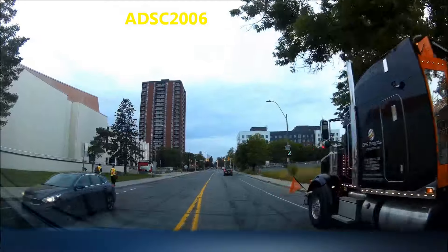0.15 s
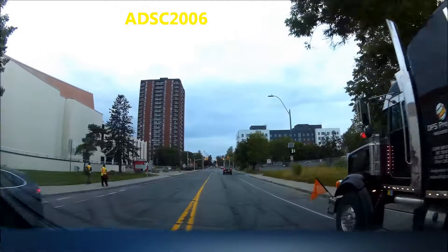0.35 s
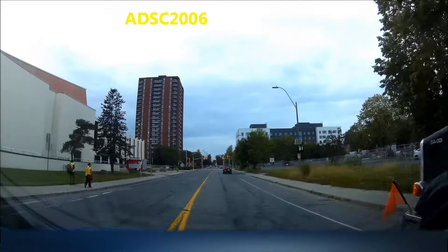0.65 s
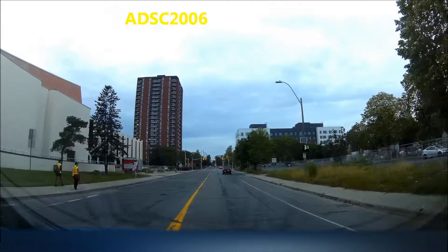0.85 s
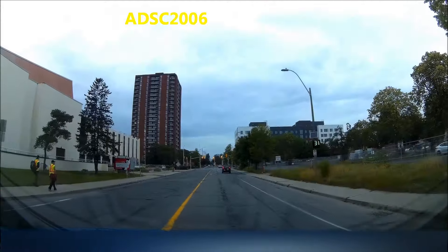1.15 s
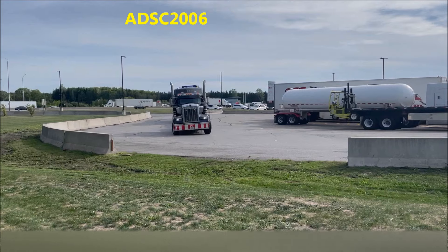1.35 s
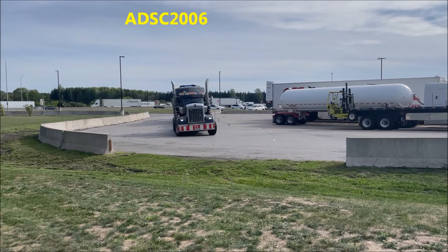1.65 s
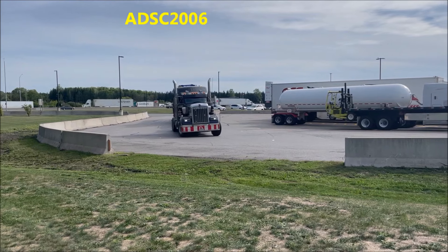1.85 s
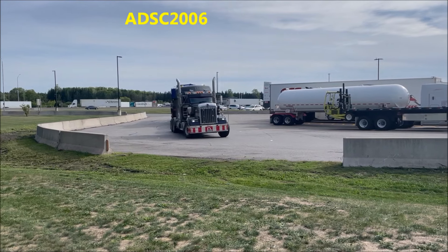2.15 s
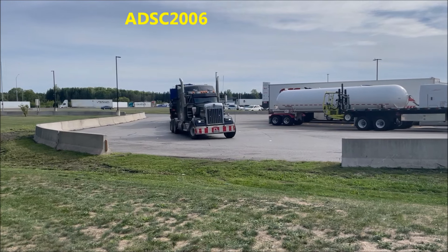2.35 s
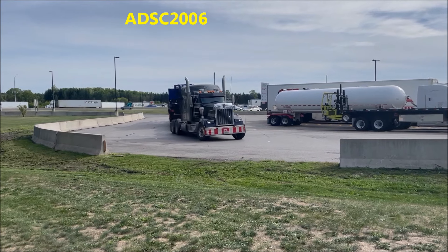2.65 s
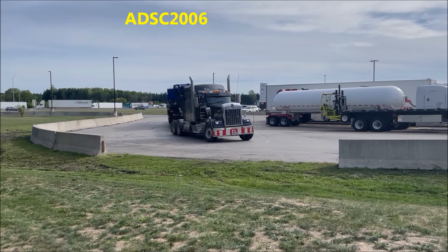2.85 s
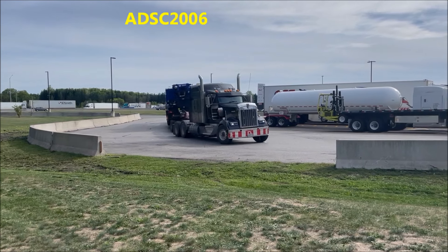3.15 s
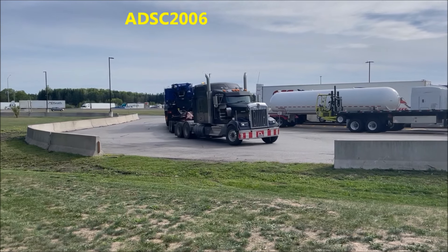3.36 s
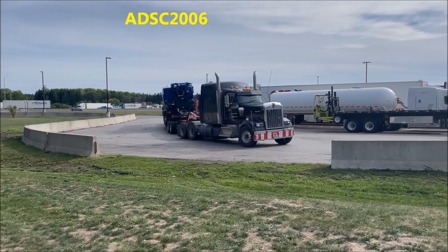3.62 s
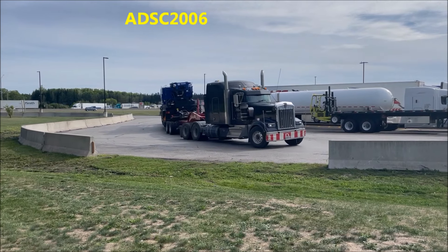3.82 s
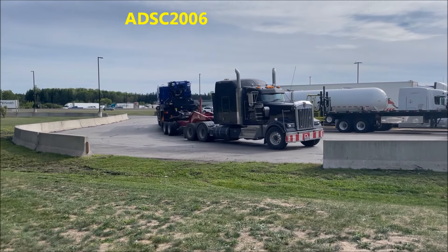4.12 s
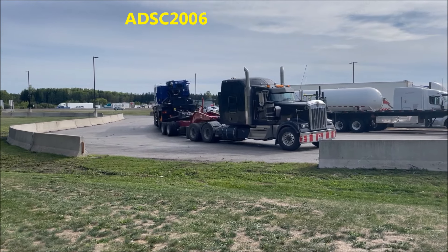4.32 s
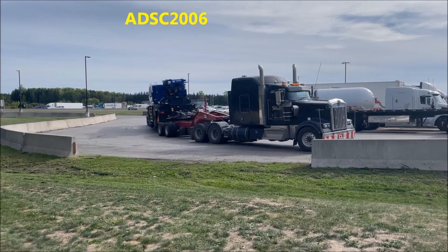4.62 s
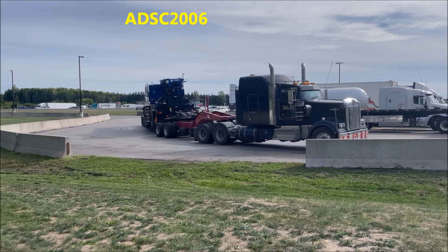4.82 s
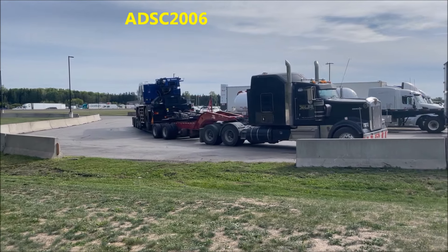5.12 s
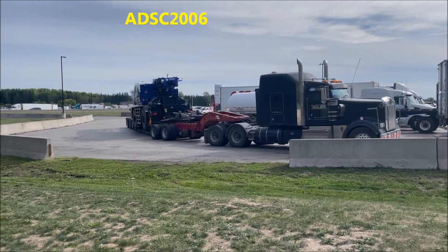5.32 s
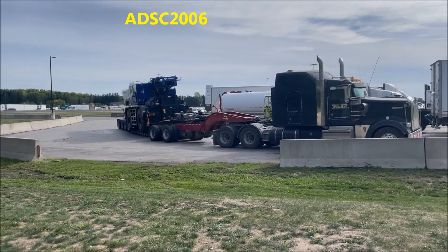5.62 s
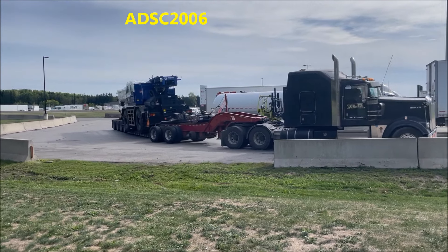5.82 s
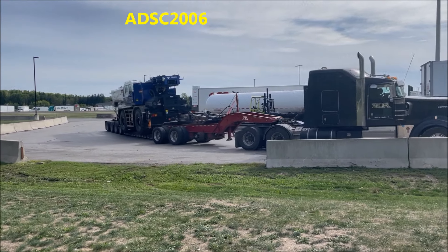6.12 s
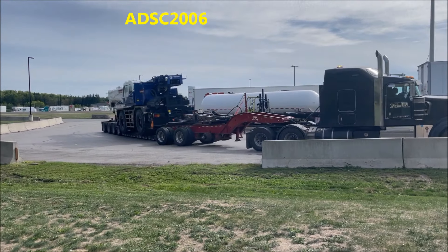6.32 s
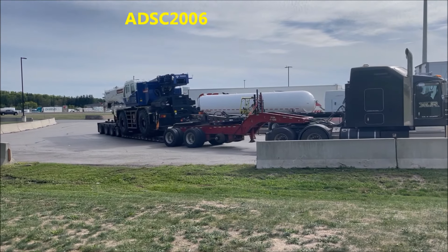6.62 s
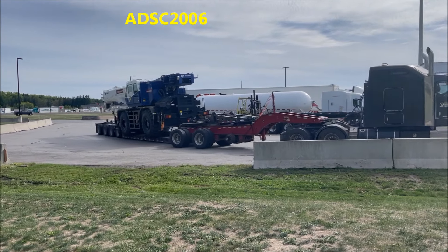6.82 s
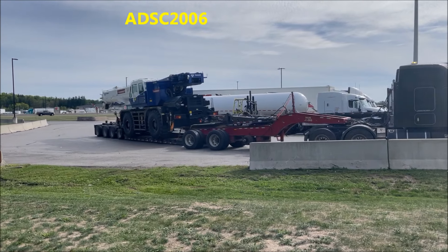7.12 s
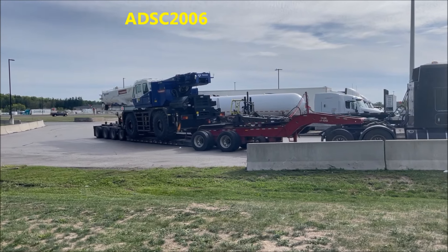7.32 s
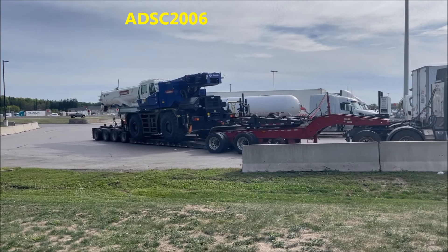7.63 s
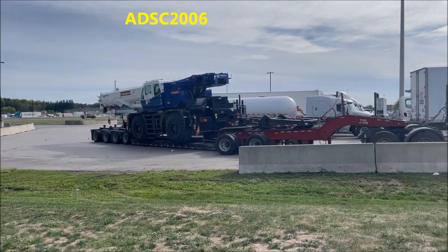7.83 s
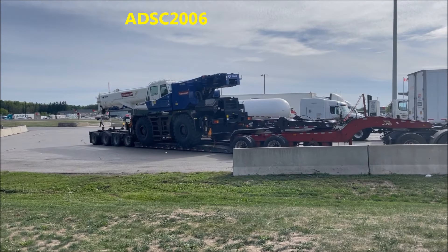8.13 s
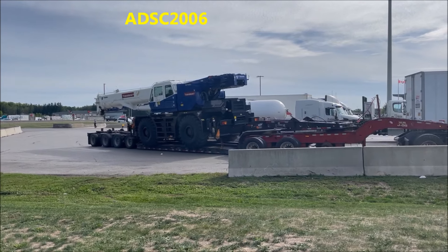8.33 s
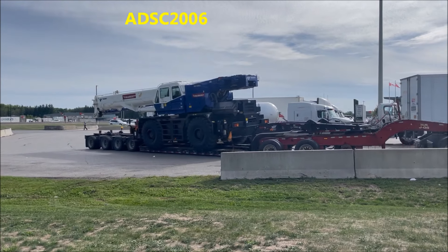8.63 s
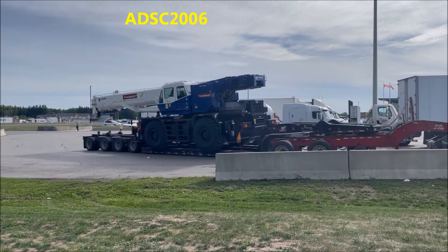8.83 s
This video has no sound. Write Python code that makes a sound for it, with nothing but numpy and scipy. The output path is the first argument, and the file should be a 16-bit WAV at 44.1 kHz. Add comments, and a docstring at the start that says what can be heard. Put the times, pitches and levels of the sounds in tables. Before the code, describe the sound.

Bassy, muffled car-interior rumble with irregular bumps comes first, the same in both ears. A hard cut leads to wide outdoor stereo: a six-cylinder diesel tractor pulling a low trailer, rumbling and clattering steadily, with brief squeal and air release. It shifts up, lugs with bright knocking, then gathers speed and draws gradually nearer. The trailer bangs dully, and near the end a faint turbo whistle sweeps upward with a rush of gas.

```python
"""Road rumble inside a moving car: bumps make the body drone and the cabin boom, and the trim rattles.
The car stops dead; after a short gap a heavy six-cylinder diesel tractor hauls a low loader across an open lot.
Metal squeals thinly, air is let off, the trailer thumps; the engine runs high, then shifts up, lugs and knocks.
Turning its side and then its rear to the listener, it draws nearer and climbs in speed again, while the
turbocharger spools up and whistles. Layers are shaped noise, sines and ringing modes under moving levels."""
import sys
import numpy as np
from scipy import signal
from scipy.fft import rfft, irfft, next_fast_len
from scipy.io import wavfile

SR = 44100
rng = np.random.default_rng(int(sys.argv[2]) if len(sys.argv) > 2 else 0)


def output_pcm(signal):
    """Save a mono or channel-first signal as 16-bit PCM at the path in sys.argv[1].

    Samples are clipped to [-1, 1] before scaling.
    """
    pcm = np.clip(np.atleast_2d(signal).T, -1, 1) * 32767
    wavfile.write(sys.argv[1], SR, np.round(pcm).astype(np.int16))


N = 395577
TIME = np.arange(N) / SR


def undb(db):
    """Decibels to gain."""
    return 10 ** (np.asarray(db) / 20)


def curve(table):
    """Draw straight lines through a (t/s, value) table, sample by sample."""
    return np.interp(TIME, *np.transpose(table))


def unit(x):
    """Scale to rms 1."""
    return x / np.sqrt(np.mean(x ** 2))


def noise():
    """White noise."""
    return rng.standard_normal(N)


def walk(rate):
    """Glide between random levels, rate of them per second; rms 1."""
    knots = rng.standard_normal(4096)
    return unit(np.interp(TIME * rate, np.arange(len(knots)), knots))


def filtered(x, response):
    """Pass x through a frequency response given as a function of Hz."""
    size = next_fast_len(N + SR // 4, True)
    f = np.fft.rfftfreq(size, 1 / SR) + 1e-3  # never quite 0 Hz
    return irfft(rfft(x, size) * response(f), size)[..., :N]


def shape(x, points, closed=False):
    """Shape x by a (f/Hz, level/dB) spectrum, which may fall away beyond its ends."""
    if closed:
        points = [(points[0][0] / 2, -90), *points, (points[-1][0] * 2, -90)]
    hz, db = np.transpose(points)
    return filtered(x, lambda f: undb(np.interp(np.log(f), np.log(hz), db)))


def band(x, points):
    """Shape x by a (f/Hz, level/dB) spectrum with closed ends, at rms 1."""
    return unit(shape(x, points, closed=True))


def ring(x, modes):
    """Drive steep-sided (f/Hz, width/Hz, level/dB) resonances; a stiff panel radiates little bass and top."""
    def response(f):
        power = 0
        for hz, width, db in modes:
            offset = (f * f - hz * hz) / (f * width)
            power = power + undb(db) ** 2 / (1 + offset ** 2) ** 2
        return np.sqrt(power) / (1 + (1100 / f) ** 4) / (1 + (f / 6000) ** 4)
    return unit(filtered(x, response))


def in_tune(hz, centre_hz, width_hz):
    """How well a pitch meets a resonance, 0-1."""
    return 1 / (1 + (2 * (hz - centre_hz) / width_hz) ** 2)


def burst(start, rise, decay):
    """An envelope that climbs for rise seconds and then dies away."""
    age = np.maximum(TIME - start, 0)
    return np.minimum(age / rise, 1) * np.exp(-np.maximum(age - rise, 0) / decay)


def swell(centre, half_length):
    """A bell-shaped envelope."""
    return np.exp(-((TIME - centre) / half_length) ** 2)


def tone(hz):
    """A sine of rms 1 on a fixed or moving pitch."""
    return np.sqrt(2) * np.sin(2 * np.pi * np.cumsum(hz * np.ones(N)) / SR)


def detuned(x, hz):
    """Move a narrow ringing up or down by a changing number of Hz."""
    analytic = signal.hilbert(x, next_fast_len(N))[..., :N]
    return np.real(analytic * np.exp(2j * np.pi * np.cumsum(hz) / SR))


def add(out, s, hz, decay, size, lag_turns):
    """Add one ringing stroke to both channels; the right one lags by part of a cycle."""
    start, age = int(s * SR), TIME[:SR // 16]
    envelope = size * (1 - np.exp(-age * hz / 2)) * np.exp(-age / decay)
    lags = np.array([[0], [lag_turns]])
    wave = envelope * np.sin(2 * np.pi * (hz * age - lags))
    out[:, start:start + len(age)] += wave[:, :max(N - start, 0)]


# bumps under the car: (t/s, half length/s, body drone level/dB, cabin boom level/dB)
BUMPS = [(0.065, 0.03, -22, -38), (0.208, 0.056, -18, -31), (0.315, 0.069, -28.5, -31.5),
         (0.467, 0.02, -31, -40), (0.514, 0.056, -23, -31), (0.605, 0.018, -22, -43),
         (0.796, 0.016, -23, -39), (0.86, 0.033, -31, -32.5), (0.929, 0.044, -18.5, -36),
         (1.031, 0.019, -25.5, -33.5), (1.158, 0.042, -29, -30), (1.243, 0.069, -21, -34)]
SMOOTH_DRONE_DB, SMOOTH_BOOM_DB = -51, -37  # between the bumps
# the cabin hums on one low resonance after a hard bump
CABIN_HZ, CABIN_DB, CABIN_PEAK_S, CABIN_HALF_LENGTH_S = 139, -36, 0.3, 0.11
SWAY_DB, SWAY_FADE_DB_PER_S = -20, 10  # the body settles on its springs
TYRE_DB, CABIN_AIR_DB, ROAD_FADE_DB_PER_S = -40, -57.5, 2.5  # levels at the start; both ease off
# spectra of body sway, panel drone, cabin boom, tyres and cabin air: (f/Hz, relative level/dB)
SWAY = [(5, -2), (13, 4), (20, -1.5), (30, -20), (60, -41)]
DRONE = [(26, -2.5), (36, -5), (42, 2), (48, -7), (58, -25), (90, -38)]
BOOM = [(50, -14), (68, 8), (92, -4), (112, -4.5), (140, -6), (168, -12), (190, -7.5), (235, -9),
        (280, -16.5), (450, -20.5), (900, -20.5)]
TYRES = [(250, -13), (500, -12.5), (810, -6), (1020, -6), (1230, -4.5), (1700, -7), (1880, -19),
         (2300, -28), (5000, -67)]
CABIN_AIR = [(1200, -16), (2200, 1.5), (3150, 5), (3600, -0.5), (5200, -1), (6500, -10), (14500, -11.5),
             (16000, -33)]
# trim rattles: (t/s, peak level/dB)
RATTLES = [(0.161, -39.5), (.541, -52), (1.124, -52), (1.146, -53), (1.174, -40.5), (1.212, -54)]
# spectrum of the rattling trim: (f/Hz, relative level/dB)
TRIM = [(500, -17), (1300, 11), (3000, 7.5), (5000, 3), (8000, -7.5), (14000, -12), (16000, -37)]
# thin electronic whine in the car: (f/Hz, level/dB)
WHINE = [(7214, -77.5), (14422, -71.5)]


def swing(points):
    """Springs and panels swing on from one jolt to the next: band noise held at an even size."""
    phase = np.angle(signal.hilbert(band(noise(), points)))
    return unit(np.cos(phase))


def car():
    """The body sways, bumps drone and boom, tyres and air come through the glass, trim rattles."""
    drone_bumps = sum(undb(db) * swell(s, half) for s, half, db, _ in BUMPS)
    boom_bumps = sum(undb(db) * swell(s, half) for s, half, _, db in BUMPS)
    drone = np.hypot(undb(SMOOTH_DRONE_DB), drone_bumps) * swing(DRONE)
    sway = undb(SWAY_DB - SWAY_FADE_DB_PER_S * TIME) * swing(SWAY)
    body = shape(sway + drone, [(60, 0.0), (150, -32), (400, -70)])

    boom = np.hypot(undb(SMOOTH_BOOM_DB), boom_bumps) * band(noise(), BOOM)
    hum_size = undb(CABIN_DB + 2 * walk(24)) * swell(CABIN_PEAK_S, CABIN_HALF_LENGTH_S)
    cabin_hum = hum_size * tone(CABIN_HZ * (1 + 0.021 * walk(20.4)))

    road = undb(TYRE_DB) * band(noise(), TYRES) + undb(CABIN_AIR_DB) * band(noise(), CABIN_AIR)
    road = undb(-ROAD_FADE_DB_PER_S * TIME) * road
    rattle_size = sum(undb(db) * burst(s, rise=0.0031, decay=0.011) for s, db in RATTLES)
    rattles = rattle_size * band(noise(), TRIM)
    whine = sum(undb(db) * tone(hz) for hz, db in WHINE)
    return body + boom + cabin_hum + road + rattles + whine


# sound scattered from all sides of the lot, against the direct sound: (f/Hz, level/dB)
SCATTER = [(60, -16), (150, -15), (300, -9), (700, -4), (1000, 0), (1500, 3), (2000, 2), (2400, -4),
           (3300, 0), (4200, -4), (5700, 0), (7500, -5), (10000, -3), (15000, -6)]


def lot_noise():
    """White noise as it arrives in the lot: part direct, part scattered and unrelated at the two ports."""
    size = next_fast_len(N, True)
    f = np.fft.rfftfreq(size, 1 / SR) + 1e-3
    hz, db = np.transpose(SCATTER)
    ratio = undb(np.interp(np.log(f), np.log(hz), db))
    direct, left, right = rng.standard_normal((3, 2 * len(f))).view(complex)
    spectra = np.array([direct + ratio * left, direct + ratio * right]) / np.hypot(1, ratio)
    return irfft(spectra, size)[:, :N]


# loose fittings and chains clink: (t/s, ring f/Hz, level/dB)
CLINKS = [(2.128, 2380, -53), (2.272, 1170, -40), (2.398, 1165, -39.5), (4.245, 2620, -45),
          (7.484, 3900, -49), (8.374, 3700, -47)]
CLINK_DECAY_S = 0.019


def fittings():
    """Loose steel parts clink, each stroke a decaying sine on its own pitch."""
    out = np.zeros((2, N))
    for s, hz, db in CLINKS:
        add(out, s, hz, CLINK_DECAY_S, undb(db), lag_turns=0)
    return out


# thin metallic squeal: (f/Hz, level/dB, start t/s, end t/s)
SQUEAL = [(9160, -72, 1.35, 1.49), (10864, -80, 1.35, 1.48), (14535, -60, 1.35, 1.57),
          (15215, -63, 1.35, 1.53), (15650, -62, 1.35, 1.46), (4334, -59, 1.645, 1.68),
          (8904, -69, 1.71, 1.78)]
SQUEAL_ATTACK_S, SQUEAL_RELEASE_S, SQUEAL_WAVER_HZ = 0.011, 0.025, 28.3


def squeal():
    """Rubbing metal sings on a few unsteady, high modes, each of which catches and lets go."""
    out = 0
    for hz, db, start, end in SQUEAL:
        attack = np.clip((TIME - start) / SQUEAL_ATTACK_S, 0, 1)
        release = np.exp(-np.maximum(TIME - end, 0) / SQUEAL_RELEASE_S)
        size = undb(db + 3.6 * np.tanh(walk(60))) * attack * release
        out = out + size * tone(hz + SQUEAL_WAVER_HZ * walk(200))
    return out


# the trailer bumps: (t/s, peak level/dB, length of the contact/s)
THUMPS = [(1.599, -27, 0.012), (5.772, -25, .011), (6.318, -31, 0.0094), (6.415, -28, 0.0062),
          (6.422, -27, 0.0012), (6.483, -35.5, 0.0027), (7.11, -38, 0.0039)]
# its steel frame rings: (f/Hz, relative level/dB, t60/s)
FRAME = [(70, -5.5, 0.1), (139, 2.5, 0.18), (194, -1.5, 0.31), (258, -5, 0.18), (303, -8, 0.25),
         (361, 2.5, 0.22), (394, 1, 0.054)]
# spectrum of the shuddering deck: (f/Hz, relative level/dB)
DECK = [(80, -15), (190, -3), (340, 1), (420, -4), (520, -4), (680, 4), (900, -18)]
DECK_DB, DECK_RISE_S, DECK_DECAY_S = -11, 0.0032, 0.083  # level against the frame's peak


def trailer():
    """Each bump rings the frame's low modes and shakes the deck; a long, soft contact leaves only the bass."""
    age = TIME[:SR // 2]
    frame = np.zeros(len(age))
    for k, (hz, db, t60) in enumerate(FRAME):
        frame += (-1) ** k * undb(db - 60 * age / t60) * np.sin(2 * np.pi * hz * age)
    deck = undb(DECK_DB) * burst(0, DECK_RISE_S, DECK_DECAY_S) * band(noise(), DECK)
    body = frame / np.abs(frame).max() + deck[:len(age)]
    out = np.zeros(N)
    for s, db, contact in THUMPS:
        push = np.sin(np.pi * np.minimum(age / contact, 1))
        thump = signal.fftconvolve(push, body)[:len(age)]
        start = int(s * SR)
        out[start:start + len(age)] += undb(db) * thump / np.abs(thump).max()
    return out


# compressed air let off: (t/s, level/dB, rise/s, decay/s, low end level/dB, top end level/dB)
AIR = [(1.51, -49.5, 0.086, 0.076, -12, -7), (1.802, -45.5, 0.039, 0.16, 2, 0),
       (3.957, -50, 0.01, 0.048, -5, 0.5)]
# spectrum the jets share: (f/Hz, relative level/dB)
VALVE = [(1500, -38), (2500, 5), (2900, 9.5), (3400, 6), (4200, 1.5), (5800, -1), (7300, 1), (8700, -0.5),
         (10300, 0), (12700, -14), (14800, -7), (16000, -9)]


def air_valves():
    """Short jets of compressed air from the brakes and the gear shift: noise bursts, each with its own colour."""
    jet = band(lot_noise(), VALVE)
    out = 0
    for s, db, rise, decay, low_db, top_db in AIR:
        coloured = shape(jet, [(2900, low_db), (4300, 0), (5100, 0), (6200, top_db)])
        out = out + undb(db) * burst(s, rise, decay) * coloured
    return out


# gas rushes in when the boost builds
GAS_START_S, GAS_RISE_S, GAS_DECAY_S, GAS_DB = 7.19, 0.12, 1.05, -56
# the charge pipe flutters on one resonance, which sinks slowly
PIPE_HZ, PIPE_WIDTH_HZ, PIPE_SAG_HZ_PER_S, PIPE_DB = 3860, 300, 150, -62
PIPE_STRONGEST_S, PIPE_HALF_LENGTH_S, PIPE_FLUTTER_DB = 7.85, 1, 4.5


def charge_pipe():
    """Once the boost is up, the gas sets the pipe ringing in uneven flutters."""
    rush = ring(lot_noise(), [(PIPE_HZ, PIPE_WIDTH_HZ, 0)])
    sag_hz = PIPE_SAG_HZ_PER_S * np.maximum(TIME - GAS_START_S, 0)
    rise = np.clip((TIME - GAS_START_S) / GAS_RISE_S, 0, 1)
    size = rise * swell(PIPE_STRONGEST_S, PIPE_HALF_LENGTH_S)
    flutter = undb(PIPE_DB + PIPE_FLUTTER_DB * np.tanh(walk(60)))
    return size * flutter * detuned(rush, -sag_hz)


# turbocharger speed: (t/s, main whistle f/Hz)
SPOOL = [(5.8, 6220), (6.3, 6520), (6.7, 6810), (6.88, 6920), (7.08, 7120), (7.27, 7750), (7.45, 8650),
         (7.7, 9600), (8, 10300), (8.3, 10650), (8.65, 10800), (8.97, 10540)]
# spectrum of the inrushing gas: (f/Hz, relative level/dB)
GAS = [(2600, -12), (3500, -5), (3900, 5), (4300, -0.5), (5200, 0), (5700, -7), (9000, -13), (12700, -21),
       (15000, -15), (16000, -19)]
# the whistles at top speed, away from the duct's resonance, and how they grow with speed
MAIN_WHISTLE_DB, LOWER_WHISTLE_DB, WHISTLE_DB_PER_OCTAVE = -72.5, -77.5, 0.5
LOWER_RATIO, FLUTTER_DB, GAS_FLUTTER_DB = .635, 5.0, 3.5  # lower whistle as a share of the main pitch
DUCT_HZ, DUCT_WIDTH_HZ, DUCT_BLOOM_DB = 6760, 610, 10.5  # intake duct's resonance


def whistle(hz, db):
    """One row of blades sings, fluttering, and blooms as it crosses the duct's resonance."""
    bloom_db = DUCT_BLOOM_DB * in_tune(hz, DUCT_HZ, DUCT_WIDTH_HZ)
    return undb(db + bloom_db + FLUTTER_DB * walk(60)) * tone(hz)


def turbo():
    """Two rows of blades on one shaft whistle, louder with speed, and gas rushes through them."""
    hz = curve(SPOOL) * (1 + .004 * walk(400) + .002 * walk(30))
    speed_db = WHISTLE_DB_PER_OCTAVE * np.log2(hz / hz.max())
    main = whistle(hz, MAIN_WHISTLE_DB + speed_db)
    lower = whistle(hz * LOWER_RATIO, LOWER_WHISTLE_DB + speed_db)
    fade_in = np.clip((TIME - SPOOL[0][0]) / 0.38, 0, 1)
    gas_size = undb(GAS_DB + GAS_FLUTTER_DB * walk(70)) * burst(GAS_START_S, GAS_RISE_S, GAS_DECAY_S)
    return fade_in * (main + lower) + gas_size * band(lot_noise(), GAS)


# how hard the engine pulls; it lugs after the upshift: (t/s, effort 0-1)
EFFORT = [(1.39, 0.4), (1.85, 0.36), (2.2, 0.43), (2.7, 0.24), (4.0, 0.44), (4.22, 0.79), (4.45, 0.64),
          (4.85, 0.58), (5.4, 0.29), (5.65, 0.24), (6.9, 0.06), (8.2, 0.28), (8.97, 0.21)]
# which way the truck faces: (t/s, 0 front, 1 side, 2 rear)
ASPECT = [(3.9, 0.17), (4.3, 0.8), (5.8, 1.03), (6.6, 1.3), (7.3, 1.45)]
# resonances of the front grille, the wheel arch at the side and the chassis behind:
# (f/Hz, width/Hz, relative level/dB)
GRILLE = [(1764, 310, 3.5), (2383, 430, -1), (2926, 130, -6), (3450, 180, -12.5), (4070, 700, -13.5),
          (4800, 720, -18.5)]
WHEEL_ARCH = [(1518, 280, 0.5), (1780, 74, -1), (1960, 320, -1), (2500, 770, -9), (2930, 240, -11),
              (3380, 340, -13)]
CHASSIS = [(1610, 220, 11), (2000, 800, -19), (2575, 640, 7.5), (3900, 400, -13), (4500, 1000, -12)]
OPENINGS = (GRILLE, WHEEL_ARCH, CHASSIS)
CLATTER_EFFORT_DB = 9  # gain at full effort
# level of a stroke on the strongest mode at no effort
STROKES_PER_S, STROKE_DB, STROKE_DECAY_S, STROKE_SCATTER_DB = 97, -46.5, 0.0069, 3.5


def strokes():
    """Covers and gears rattle at random, harder under load, each on one resonance facing the listener."""
    out, aspect, effort = np.zeros((2, N)), curve(ASPECT), curve(EFFORT)
    chance = rng.random((2048, 5))
    for when, pick, detune, force, lag in chance[:int(STROKES_PER_S * N / SR)]:
        i = int(when * N)
        modes = OPENINGS[int(np.clip(np.rint(aspect[i]), 0, 2))]
        hz, width, db = modes[int(pick * len(modes))]
        db = db - max(mode[2] for mode in modes) + STROKE_DB
        db = db + CLATTER_EFFORT_DB * effort[i] + STROKE_SCATTER_DB * (2 * force - 1)
        add(out, TIME[i], hz + width * (detune - .5) / 2, STROKE_DECAY_S, undb(db), lag)
    return out


# modes of the tapped cover: (f/Hz, width/Hz, relative level/dB, clearest at t/s)
COVER = [(1850, 250, 0, 2.9), (2450, 380, 0.5, 3), (2970, 180, -0.5, 3.45), (3430, 200, -8, 2.8)]
TAP_DB, TAP_HALF_LENGTH_S, TAP_DECAY_S = -59, 1.2, 0.022  # half length of each mode's swell
TAP_SCATTER_DB, TAP_WANDER_HZ = 1.2, 25


def tapping(cycle_age):
    """One cylinder taps its cover once a cycle; the mix and pitch of the cover's modes wander."""
    taps = lot_noise() * np.exp(-cycle_age / TAP_DECAY_S)
    out = 0
    for hz, width, db, clearest in COVER:
        size = undb(TAP_DB + db + TAP_SCATTER_DB * walk(12)) * swell(clearest, TAP_HALF_LENGTH_S)
        out = out + size * ring(taps, [(hz, width, 0)])
    return detuned(out, TAP_WANDER_HZ * walk(15))


# engine speed; the dip is the upshift: (t/s, crank revolutions per second)
CRANK = [(1.39, 31.5), (2.3, 30.74), (3.53, 30.74), (3.74, 27.8), (3.82, 25.8), (4.08, 24.5), (4.28, 20.2),
         (4.55, 21.8), (4.9, 25.3), (5.15, 26.2), (5.7, 26.8), (6.2, 27.8), (8, 32.4), (8.97, 33.2)]
# knock of each cylinder in firing order: relative level/dB
CYLINDER_DB = [3.5, 5.5, 3, 3.5, 1, 5]
CYCLE_START_S = 2.399  # a cycle begins here


def firings(scatter_db):
    """Six cylinders fire three times a turn: firing count, firing rate and the strength of each firing."""
    firing_hz = 3 * curve(CRANK) * (1 + .002 * walk(9))
    count = np.cumsum(firing_hz) / SR
    count = count - count[int(CYCLE_START_S * SR)]
    index = np.floor(count).astype(int)
    chance_db = scatter_db * np.tanh(rng.standard_normal(2048))[index]
    strength = undb(np.take(CYLINDER_DB, index, mode="wrap") + chance_db)
    return count, firing_hz, strength


REPEAT_SHARE = 0.19  # part of the noise power that comes back alike every cycle


def cyclic_noise(count):
    """Engine noise, partly fresh and partly a pattern that comes round again with every six firings."""
    size = 3000  # steps in the pattern
    place = (count / len(CYLINDER_DB)) % 1 * size
    pattern = np.array([np.interp(place, np.arange(size), x[:size]) for x in lot_noise()])
    share = np.clip(REPEAT_SHARE, 0, 1)
    return np.sqrt(share) * pattern + np.sqrt(1 - share) * lot_noise()


# what the front, the side and the rear give off, one row each, at the nearest point:
# (exhaust level/dB, roar level/dB, clatter level/dB, hiss level/dB, share of sharp knocks 0-1)
FACES = [(-37.5, -43, -51, -62, 0.08), (-37.5, -43.5, -50.5, -56.5, 0.13), (-35.5, -43.5, -54, -55.5, 0.3)]
# spectra of exhaust rumble, roar, growl and hiss: (f/Hz, relative level/dB)
EXHAUST = [(15, -37), (30, -16), (45, -5), (65, 0), (82, -1.5), (100, -3.5), (130, -6.5), (165, -12.5),
           (192, -11.5), (225, -15), (290, -17.5), (400, -21.5), (900, -53)]
ROAR = [(180, -17.5), (290, -2.5), (410, -5), (480, -0.5), (560, -1.5), (680, 1.5), (790, 2.5), (950, 0.5),
        (1200, 1), (1380, -3.5), (1700, -8.5), (2300, -12.5), (4000, -39)]
GROWL = [(540, -6.5), (620, -1.5), (675, 2.5), (710, -2), (750, 2), (820, -1), (900, -6)]
HISS = [(1500, -22), (2800, -4), (3800, 1), (4800, -1.5), (5700, -3), (6800, -0.5), (7800, -3),
        (8700, -9.5), (10300, -8.5), (12700, -23), (15000, -20), (16000, -14)]
# the block's growl: (t/s, level/dB at the nearest point)
GROWL_DB = [(1.39, -43), (1.65, -44.5), (1.8, -40), (2.05, -47.5), (2.5, -74), (2.75, -47), (3.0, -50),
            (4.06, -58), (4.18, -43.5), (4.52, -44.5), (4.8, -45.5), (5.35, -43), (5.75, -50),
            (6.45, -47.5), (7.2, -49.5), (8.97, -51)]
# harder, brighter knock while lugging: (f/Hz, width/Hz, relative level/dB)
LUG = [(1830, 110, 7.5), (3400, 200, -8), (3780, 350, -6), (6300, 560, -6), (7300, 1100, -5)]
LUG_DB, LUG_PEAK_S, LUG_HALF_LENGTH_S = -44, 4.46, 0.21  # just after the upshift
ROAR_EFFORT_DB, HISS_EFFORT_DB = 5.5, 7.5  # gain at full effort
# the firing hum, relative to the exhaust rumble, blooms where it meets the resonance of the stacks
HUM_DB, STACK_HZ, STACK_WIDTH_HZ, STACK_BLOOM_DB = -13.5, 79, 3.8, 11.5
TRUCK_M_PER_S, NEAREST_M, PASSES_S = 2.26, 23.9, 10.2  # straight path; nearest only after the end


def engine():
    """Firings puff from the stacks and knock on the block; fan and gears roar; all grow as the truck nears."""
    effort, aspect = curve(EFFORT), curve(ASPECT)
    exhaust_db, roar_db, clatter_db, hiss_db, sharp = (
        np.interp(aspect, np.arange(len(FACES)), column) for column in np.transpose(FACES))
    sharp = np.clip(sharp, 0, 1)
    count, firing_hz, strength = firings(scatter_db=12.0)
    knock = unit(strength * np.exp(-(count % 1) / firing_hz / 0.0066))  # decay in s
    blows = np.sqrt(sharp * knock ** 2 + 1 - sharp)

    # the mufflers leave mostly turbulent rumble, with a little of the firing note
    puff = 1 + 0.35 * np.cos(2 * np.pi * count)
    hum_db = HUM_DB + STACK_BLOOM_DB * in_tune(firing_hz, STACK_HZ, STACK_WIDTH_HZ)
    firing_note = unit(np.sin(2 * np.pi * count) + undb(-20.0) * np.sin(4 * np.pi * count))
    hum = firing_note * undb(hum_db + 3.1 * walk(12))
    rumble = band(lot_noise() * puff, EXHAUST)
    exhaust = undb(exhaust_db) * (rumble + hum) / np.hypot(1, undb(hum_db))

    roar_size = undb(roar_db + ROAR_EFFORT_DB * effort + 0.34 * walk(14))
    roar = roar_size * band(cyclic_noise(count) * (1 + 0.43 * blows), ROAR)
    growl = undb(curve(GROWL_DB)) * band(cyclic_noise(count) * (1 + 0.5 * knock), GROWL)
    lug_size = undb(LUG_DB) * swell(LUG_PEAK_S, LUG_HALF_LENGTH_S)
    lug = lug_size * ring(lot_noise() * (1 + 1.2 * knock), LUG)

    # as the truck turns, the clatter escapes through one opening after another
    clatter = 0
    for k, modes in enumerate(OPENINGS):
        facing = np.sqrt(np.maximum(1 - np.abs(aspect - k), 0))
        clatter = clatter + facing * ring(lot_noise() * blows, modes)
    clatter = undb(clatter_db + CLATTER_EFFORT_DB * effort) * clatter

    tap = tapping(count % len(CYLINDER_DB) / firing_hz)
    hiss_size = undb(hiss_db + HISS_EFFORT_DB * effort + .5 * walk(15))
    hiss = hiss_size * band(lot_noise() * (1 + 3.2 * blows), HISS)
    distance_m = np.hypot(NEAREST_M, TRUCK_M_PER_S * (TIME - PASSES_S))
    return (exhaust + roar + growl + lug + clatter + tap + hiss) * NEAREST_M / distance_m


# left minus right: (f/Hz, level/dB)
BALANCE_DB = [(150, 0), (350, 0), (520, -3), (700, -0.4), (950, -3.5), (1350, 0.5), (2100, 0), (2400, 4),
              (3600, 1), (4700, 6), (5500, 1.5), (6000, -6), (7000, -0.8), (8500, -0.5)]
# how far the left port leads the right: (f/Hz, phase/radians)
PORT_LEAD = [(0, 0), (300, -0.2), (900, -0.6), (1200, 0.3), (1550, 3), (1900, 1.4), (2300, 1.7), (2950, 0),
             (3600, 1.1), (5000, 1), (5900, 2.4), (6500, 1.1), (7200, 1.2), (8600, 3.1), (10500, 6.3),
             (14800, 12.6)]


def ports(left, right):
    """The two microphone ports colour the sound differently and shift it against each other."""
    hz, radians = np.transpose(PORT_LEAD)
    right = filtered(right, lambda f: np.exp(-1j * np.interp(f, hz, radians)))
    left = shape(left, [(f, db / 2) for f, db in BALANCE_DB])
    right = shape(right, [(f, -db / 2) for f, db in BALANCE_DB])
    return np.array([left, right])


CAR_END_S, LOT_START_S = 1.341, 1.389


def scene():
    """The car, the same in both ears; a short silence; the truck in the lot."""
    load = trailer() + fittings() + squeal()
    tractor = engine() + strokes() + air_valves() + turbo() + charge_pipe()
    truck = ports(*(tractor + load))
    inside = np.clip((CAR_END_S - TIME) / .002, 0, 1)
    outside = np.clip((TIME - LOT_START_S) / .002, 0, 1)
    return inside * car() + outside * truck


TOP_HZ = 15800


def record(dry):
    """The recorder cuts the top with a steep low-pass."""
    return signal.sosfilt(signal.ellip(10, .2, 80, TOP_HZ, fs=SR, output="sos"), dry)


dry = scene()
out = record(dry)
output_pcm(out)
```